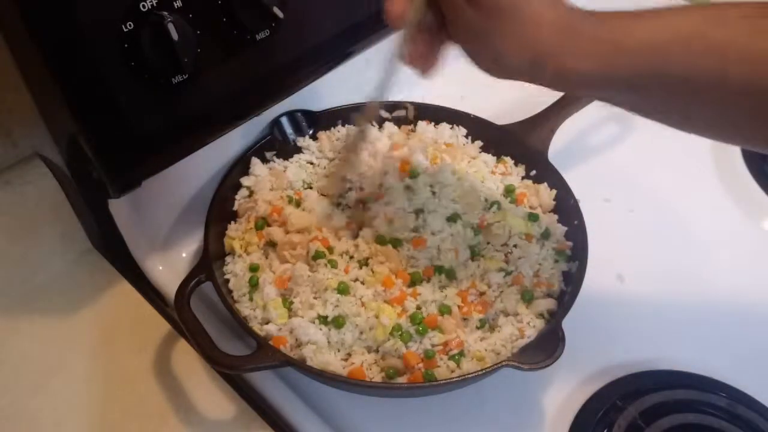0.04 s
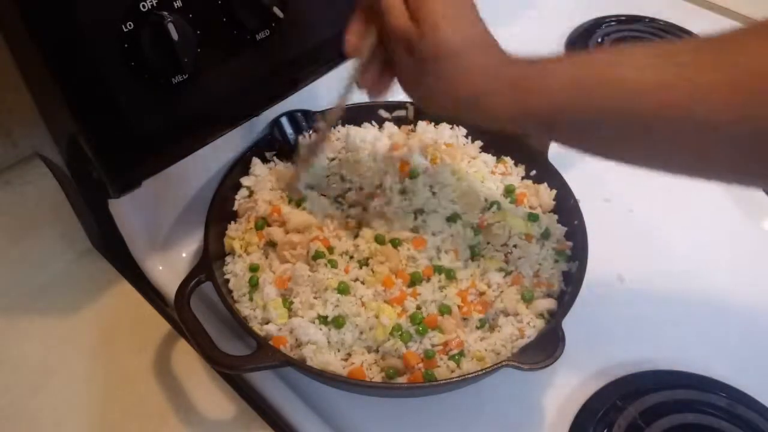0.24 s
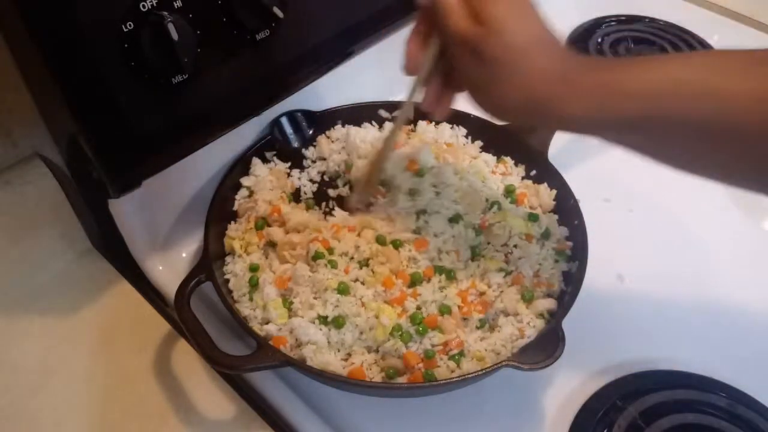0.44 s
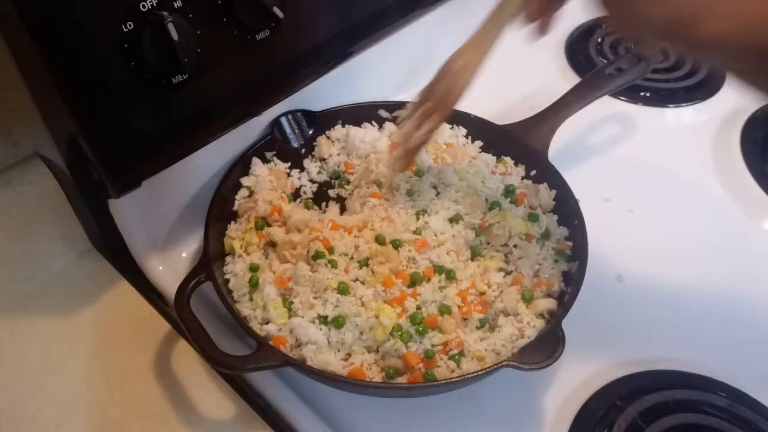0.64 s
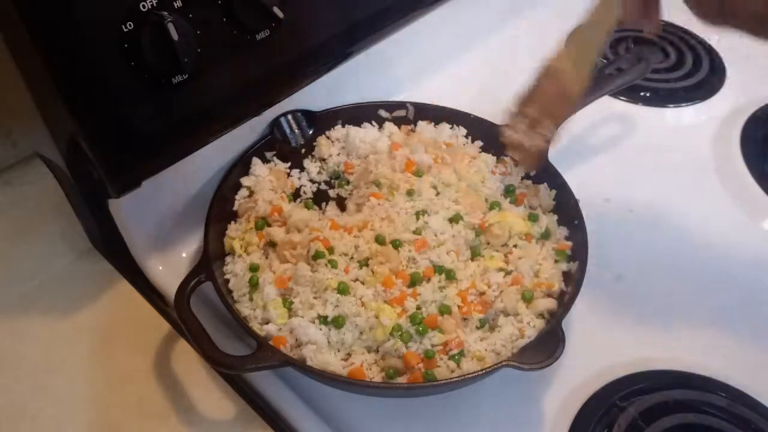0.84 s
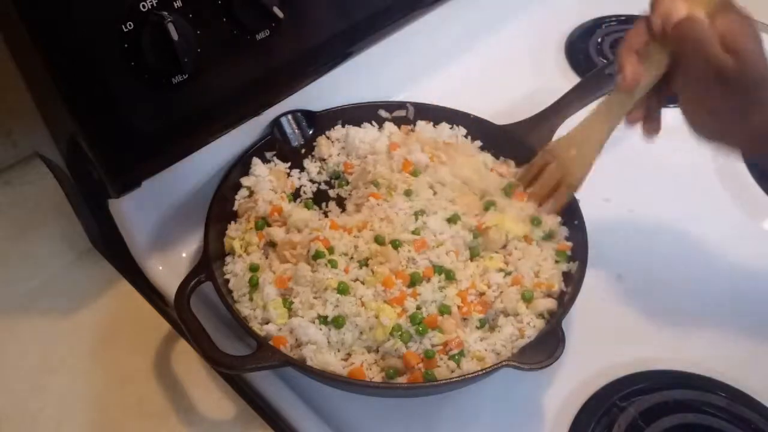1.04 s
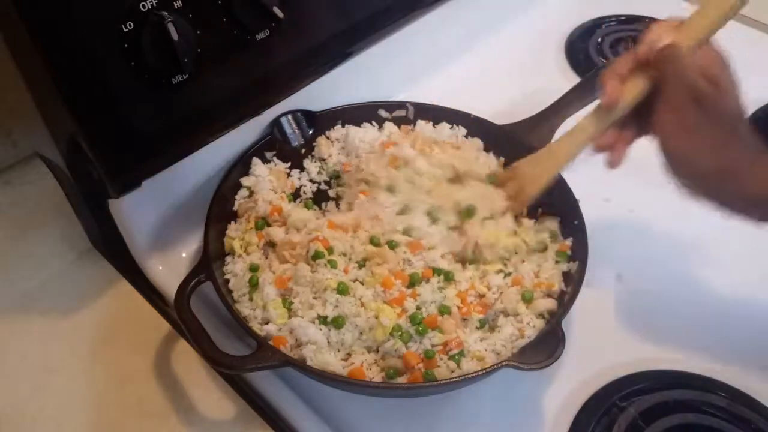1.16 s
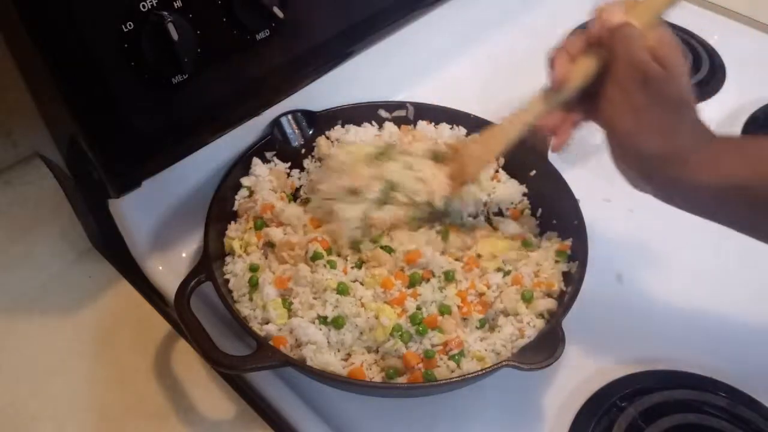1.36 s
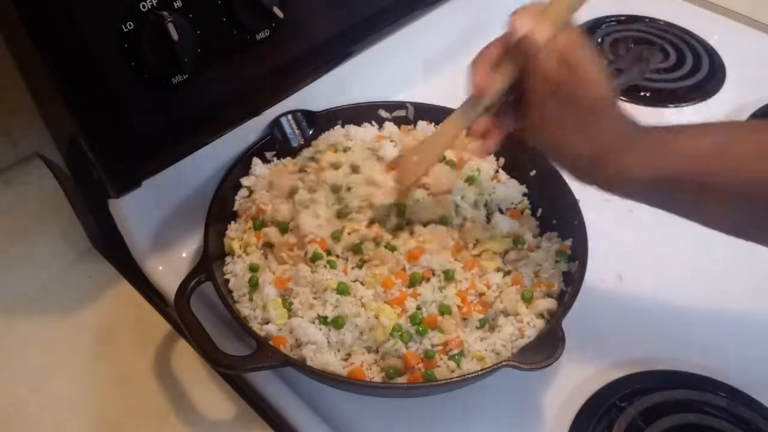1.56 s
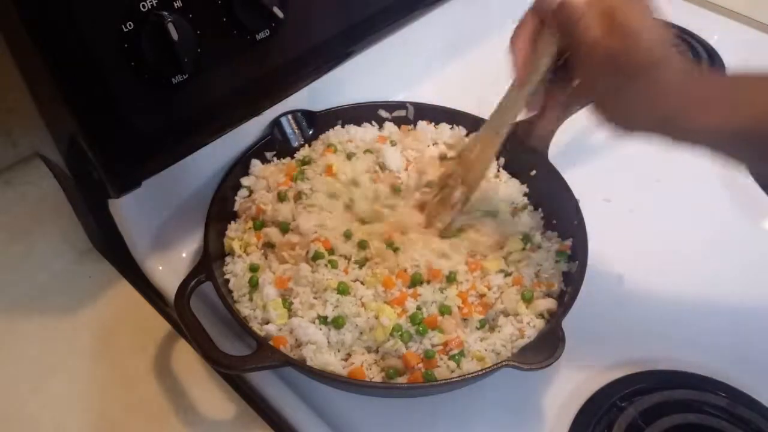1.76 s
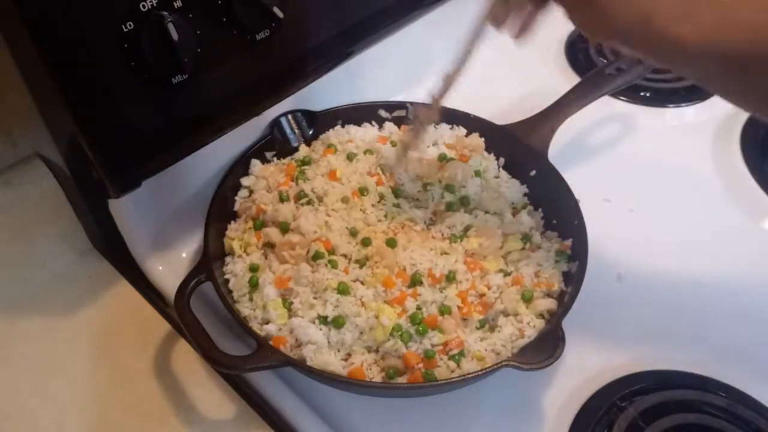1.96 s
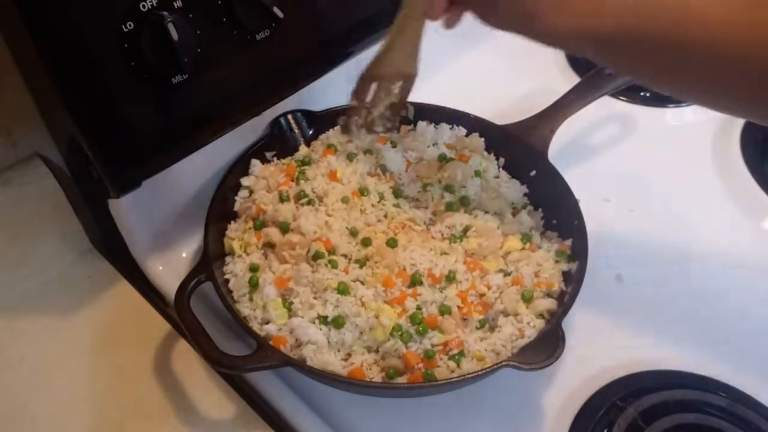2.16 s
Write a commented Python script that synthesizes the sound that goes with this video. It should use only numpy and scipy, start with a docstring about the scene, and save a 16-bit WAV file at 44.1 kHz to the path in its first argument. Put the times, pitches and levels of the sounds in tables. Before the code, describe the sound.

Stirring rice in an iron pan, a wooden spatula starts with one loud, briefly ringing knock, followed by quiet crunches, dull thuds and taps. Underneath are a faint sizzle and a low appliance hum in a small kitchen.

```python
"""A wooden spatula turns fried rice in a cast-iron skillet on a stove top.
Wood knocks the pan once: the iron rings, the stove top booms and the pan ticks against the burner.
The blade chops through the grains with a crunch, thuds and taps through to the iron, drags softly
and bumps the bottom. Underneath, bursts of moisture and steam make a faint sizzle and an appliance
hums. A small kitchen adds a short, dull tail."""
import sys
import numpy as np
from scipy import signal
from scipy.fft import rfft, irfft
from scipy.io import wavfile

SR = 44100
rng = np.random.default_rng(int(sys.argv[2]) if len(sys.argv) > 2 else 0)


def to_wav(sig):
    """Store sig (one row per channel, or 1-D mono) as 16-bit WAV at the path in sys.argv[1].

    Samples outside -1..1 are clipped; the rate is SR.
    """
    pcm = np.clip(np.atleast_2d(sig), -1, 1) * 32767
    pcm = np.round(pcm).astype(np.int16)
    wavfile.write(sys.argv[1], SR, pcm.T)  # frames by channels


N = 97020


def undb(db):
    """Decibels to gain."""
    return 10 ** (np.asarray(db) / 20)


def unit(x):
    """Scale to an rms of 1."""
    return x / np.sqrt(np.mean(x ** 2))


def since(start):
    """Seconds since a start time, zero before it."""
    return np.maximum(np.arange(N) / SR - start, 0)


def curve(rows):
    """Gain over time from (t/s, level/dB) points."""
    return undb(np.interp(since(0), *np.array(rows).T))


def envelope(start, rise, hold, t60):
    """Linear attack, hold, exponential decay; all times in seconds."""
    t = since(start)
    decay = np.exp(-np.log(1000) * np.maximum(t - rise - hold, 0) / t60)
    return np.minimum(t / rise, 1) * decay


def colour(x, points):
    """EQ a signal through (f/Hz, level/dB) points, then scale to an rms of 1."""
    hz, db = np.array(points).T
    bins = np.maximum(np.fft.rfftfreq(N, 1 / SR), 1)
    gain = undb(np.interp(np.log(bins), np.log(hz), db))
    return unit(irfft(rfft(x) * gain, N))


def noise():
    """White noise."""
    return rng.standard_normal(N)


def grains(per_s, scatter_db):
    """Tiny clicks at random times, a few much larger than the rest."""
    size = undb(scatter_db * np.minimum(rng.exponential(size=N), 5))
    fires = rng.random(N) < per_s / SR
    return unit(fires * size * np.sign(noise()))


def ring(modes, start, rise, hold=0):
    """Decaying sines from (f/Hz, level/dB, t60/s) modes."""
    return sum(undb(db) * np.sin(2 * np.pi * hz * since(start)) * envelope(start, rise, hold, t60)
               for hz, db, t60 in modes)


def kitchen(x, wet_db):
    """Add the small room's short, dull tail."""
    damping_hz = 2500
    tail = signal.sosfilt(signal.butter(1, damping_hz, fs=SR, output="sos"), noise())
    tail *= envelope(0, rise=0.029, hold=0, t60=0.64)
    return x + undb(wet_db) * signal.fftconvolve(x, tail / np.linalg.norm(tail))[:N]


def sizzle():
    """Tiny bursts of moisture over a smooth hiss of steam; freshly turned rice adds a fine fizz."""
    # fader ride of the sizzle: t/s, level/dB
    ride = [(0, -55), (.18, -56), (.5, -56.5), (.75, -56.5), (.96, -56.5), (1.15, -55.5), (1.33, -55),
            (1.45, -55), (1.75, -55), (1.9, -56.5), (2.07, -54), (2.2, -54.5)]
    # spectra of the frying bed and the airy fizz: f/Hz, level/dB
    bed_eq = [(200, -27), (480, -27), (640, -23.5), (820, -0.5), (1300, -0.5), (2100, 1.5), (3000, -7),
              (3900, -16.5), (6000, -7), (7600, -9), (8600, -3.5), (10200, -15), (13800, -24.5),
              (15400, -16)]
    fizz_eq = [(6000, -19), (10500, 0), (13500, -5), (15400, 0)]
    pops = kitchen(grains(per_s=4000, scatter_db=2.5), wet_db=-13.5)
    steam = undb(-1.5) * noise()
    bed = undb(-2) * curve(ride) * colour(pops + steam, bed_eq)
    fade_in = np.minimum(since(1.0) / 0.28, 1)
    return bed + undb(-76) * fade_in * colour(pops, fizz_eq)


def appliance_hum():
    """A wavering hum over a soft rumble; the level of both dips briefly."""
    # fader ride of the appliance: t/s, level/dB
    ride = [(0, -75), (.15, -63), (.45, -60.5), (.62, -75), (.9, -66.5), (1.17, -59.5), (1.24, -96),
            (1.33, -92), (1.42, -64), (1.54, -74.5), (1.62, -65.5), (2.2, -68.5)]
    # spectrum of its rumble: f/Hz, level/dB
    rumble_eq = [(25, -14), (50, -17), (75, -6), (110, -4.5), (150, 2), (230, -9.5), (400, -21.5),
                 (700, -19), (2000, -28)]
    hum_hz, waver_db = 118.4, 3
    waver = colour(noise(), [(6, 0), (40, -60), (200, -120)])
    tone = np.sqrt(2) * np.sin(2 * np.pi * hum_hz * since(0)) * undb(waver_db * waver)
    rumble = undb(-3) * colour(noise(), rumble_eq)
    return curve(ride) * (tone + rumble)


def blade_drags():
    """Wood rubs softly over the pan with a hollow tone."""
    # strokes of the blade: t/s, level/dB, rise/s, hold/s, t60/s
    strokes = [(0, -65.5, 0.0026, 0.049, 0.14), (0.554, -65.5, 0.013, 0.029, 0.34),
               (0.724, -74, 0.069, 0.2, .3), (1.177, -75, 0.015, 0.053, 0.22),
               (1.794, -67.5, 0.022, 0.035, 0.37)]
    # spectrum of the rubbing: f/Hz, level/dB
    rub_eq = [(250, -8), (430, -14), (505, -1), (560, -2.5), (640, -18), (1200, -42)]
    pressure = sum(undb(db) * envelope(start, rise, hold, t60) for start, db, rise, hold, t60 in strokes)
    return pressure * colour(noise(), rub_eq)


def pan_knock():
    """Wood meets iron: a clatter, and modes that swell, drop quickly and then ring on faintly."""
    # spatula hit on the pan: t/s, level/dB
    hits = [(0.2088, -22.5)]
    # modes of the pan on its burner: f/Hz, level/dB, t60/s, after-ring level/dB
    pan_modes = [(342, -10, .25, -20), (389, -15, .2, -23), (453, -13, .13, -24), (560, -3, .14, -17),
                 (814, 1, .14, -23), (876, -13, .16, -28), (938, -16, .22, -19), (1085, -21, .16, -32),
                 (1356, -5.5, .16, -29), (1500, -11.5, .13, -32), (1885, -10.5, .14, -32),
                 (1990, -21, .16, -30), (2296, -16.5, .14, -34), (2855, -24, .18, -44)]
    # spectrum of the dense, woody clatter: f/Hz, level/dB
    clatter_eq = [(30, -36), (70, -25), (130, -9), (230, -13), (380, 0), (650, 0.5), (900, -1.5),
                  (1900, -5.5), (2700, -14), (3900, -25.5), (6000, -20), (8700, -22), (12000, -29.5),
                  (16000, -28)]
    after_ring_t60_s = 0.48
    struck = [(hz, db, t60) for hz, db, t60, _ in pan_modes]
    after_ring = [(hz, db, after_ring_t60_s) for hz, _, _, db in pan_modes]
    clatter = undb(-7.5) * colour(noise(), clatter_eq)
    out = 0
    for start, db in hits:
        iron = ring(struck + after_ring, start, rise=0.009, hold=0.007)
        wood = clatter * envelope(start, rise=0.00055, hold=0.013, t60=0.15)
        out += undb(db) * (kitchen(iron, wet_db=-29.5) + kitchen(wood, wet_db=-10.5))
    return out


def stove_boom():
    """The stove top answers a knock or a push with one low mode."""
    # booms under the pan: t/s, f/Hz, level/dB, t60/s
    booms = [(0.214, 142.4, -48, 0.93), (1.005, 143, -48, 0.44)]
    return sum(ring([(hz, db, t60)], start, rise=0.018) for start, hz, db, t60 in booms)


def burner_tick():
    """Iron slips on the burner: a bright ping swells and ends in a tiny crack."""
    # slip of the pan: t/s, level/dB, rise/s
    slips = [(0.251, -34.5, 0.0067)]
    # modes of the metal ping: f/Hz, level/dB, t60/s
    ping_modes = [(8740, -1.5, .04), (8880, -11.5, 0.1), (7400, -17, 0.05), (12650, -19, 0.044)]
    bright_noise = undb(-7) * colour(noise(), [(1500, -6), (3500, 3), (9000, 1), (15000, -4)])
    out = 0
    for start, db, rise in slips:
        crack = bright_noise * envelope(start + rise, rise=0.0018, hold=0, t60=0.047)
        out += undb(db) * (ring(ping_modes, start, rise) + crack)
    return kitchen(out, wet_db=-12)


def rice_chops():
    """Each cut parts a mass of grains: moist ones crunch low, fried ones crackle high."""
    # cuts into the rice: t/s, level/dB, rise/s, hold/s, t60/s, crisp share (0-1)
    cuts = [(0.277, -51.5, 0.042, 0.04, 0.22, 0.85), (0.873, -56.5, 0.0017, 0.0026, 0.054, .1),
            (0.9861, -42.5, 0.0072, 0.016, 0.17, 0.31), (1.022, -51, 0.0056, 0.0083, 0.058, 0.94),
            (1.215, -54.5, 0.0031, 0.006, 0.017, 0.63), (1.304, -65, 0.0091, 0.021, .06, 0.01),
            (1.594, -45.5, .002, 0.01, 0.089, 0.01), (1.654, -55.5, 0.028, 0.033, 0.16, .05)]
    # spectra of moist and of crisp grains: f/Hz, level/dB
    moist_eq = [(200, -47), (560, -21), (760, 0), (2000, -1.5), (3000, -10), (4200, -18.5), (6500, -12),
                (8700, -14), (11500, -22.5), (15500, -23)]
    crisp_eq = [(1500, 2), (4000, -11.5), (6500, 1), (8700, 4.5), (10500, -2), (13000, -12), (15500, -4.5)]
    moist, crisp = (colour(grains(per_s=8000, scatter_db=3.5), eq) for eq in (moist_eq, crisp_eq))
    out = 0
    for start, db, rise, hold, t60, share in cuts:
        crunch = np.sqrt(1 - share) * moist + np.sqrt(share) * crisp  # equal-power blend
        out += undb(db) * envelope(start, rise, hold, t60) * crunch
    return kitchen(out, wet_db=-10)


def rice_thuds():
    """Pushes reach the pan through a cushion of rice and land as dull thuds."""
    # pushes of the blade: t/s, level/dB, t60/s
    pushes = [(0.995, -46, 0.11), (1.012, -47, 0.47), (1.048, -52, 0.058)]
    # spectrum of a cushioned thud: f/Hz, level/dB
    thud_eq = [(30, -29), (80, -10), (130, -1), (200, -10.5), (320, -6), (430, -9.5), (650, -16),
               (1000, -31), (3000, -35.5)]
    force = sum(undb(db) * envelope(start, rise=0.0015, hold=0, t60=t60) for start, db, t60 in pushes)
    return force * colour(noise(), thud_eq)


def blade_taps():
    """The wooden blade rings briefly when it taps through to the iron."""
    # taps on the iron: t/s, level/dB
    taps = [(0.996, -47), (1.0275, -40), (1.595, -55.5)]
    # modes of the blade: f/Hz, level/dB, t60/s
    blade_modes = [(860, -5.5, 0.046), (1090, -5, 0.1), (1445, -13, 0.25), (1780, -4, 0.088),
                   (1913, -0.5, 0.062), (2090, 0, 0.057)]
    wood = sum(undb(db) * ring(blade_modes, start, rise=0.00083) for start, db in taps)
    return kitchen(wood, wet_db=-29)


def bottom_bump():
    """The blade bumps the pan bottom: a soft, hollow ring with a scuff of noise."""
    # bump of the blade: t/s, level/dB
    bumps = [(1.721, -51.5)]
    # modes of the hollow ring: f/Hz, level/dB, t60/s
    hollow_modes = [(357, -12, 0.6), (367, -12, 0.19), (436, -11, 0.37), (456.7, -1, 0.33)]
    # spectrum of the scuff: f/Hz, level/dB
    scuff_eq = [(150, -28), (290, -29), (360, 6), (470, -7), (560, -6), (1000, -33)]
    rise_s = 0.013
    scuff_noise = undb(-5) * colour(noise(), scuff_eq)
    out = 0
    for start, db in bumps:
        scuff = scuff_noise * envelope(start, rise_s, hold=0, t60=0.31)
        out += undb(db) * (ring(hollow_modes, start, rise_s) + scuff)
    return out


def scene():
    """The spatula and pan over a bed of sizzle and hum, in mono."""
    bed = sizzle() + appliance_hum()
    pan = blade_drags() + pan_knock() + stove_boom() + burner_tick()
    turning = rice_chops() + rice_thuds() + blade_taps() + bottom_bump()
    return (bed + pan + turning)[None]


def record(dry):
    """A steep low-pass trims the very top of the treble."""
    cutoff_hz = 15800
    return signal.sosfilt(signal.ellip(10, 0.2, 70, cutoff_hz, fs=SR, output="sos"), dry)


dry = scene()
out = record(dry)
to_wav(out)
```